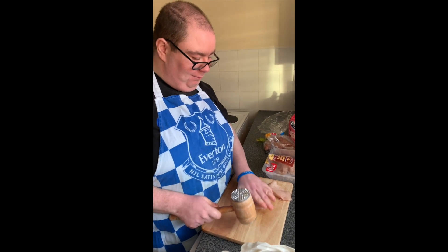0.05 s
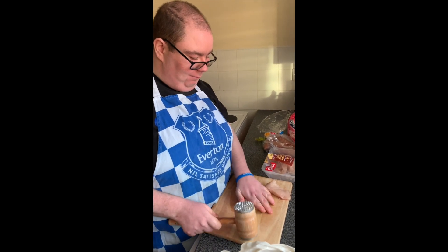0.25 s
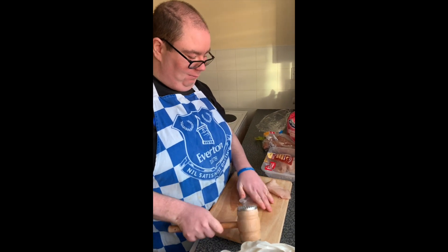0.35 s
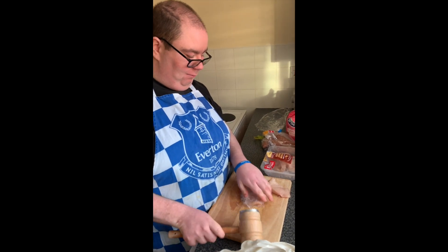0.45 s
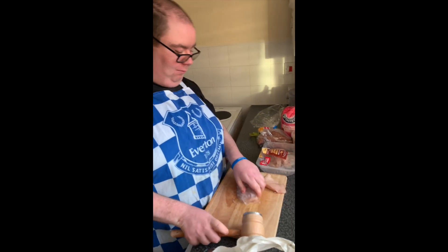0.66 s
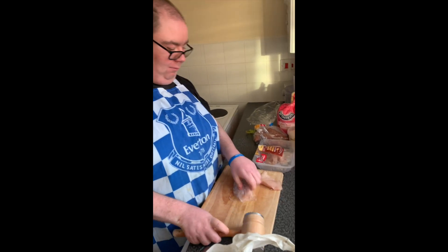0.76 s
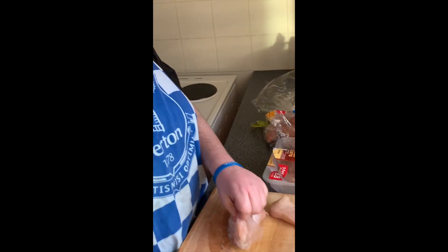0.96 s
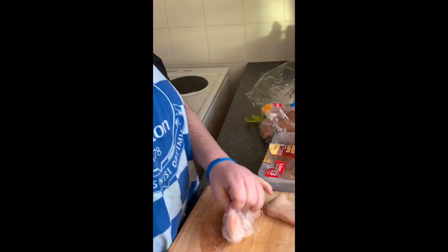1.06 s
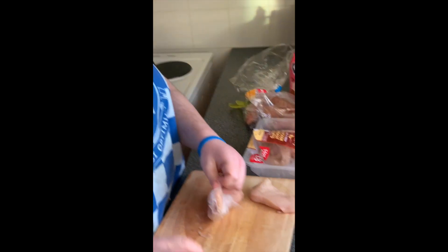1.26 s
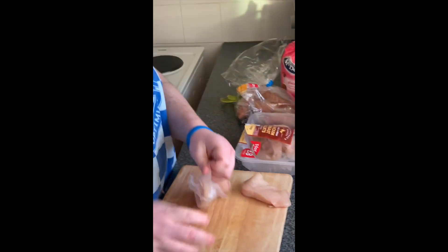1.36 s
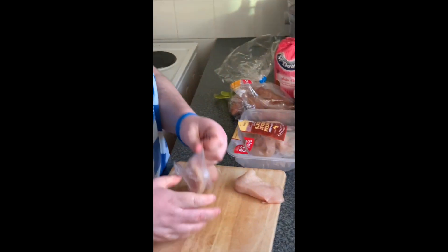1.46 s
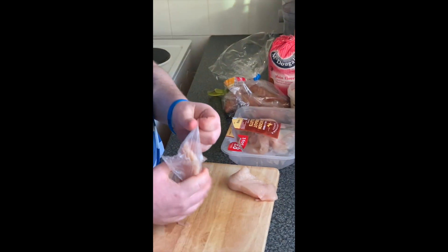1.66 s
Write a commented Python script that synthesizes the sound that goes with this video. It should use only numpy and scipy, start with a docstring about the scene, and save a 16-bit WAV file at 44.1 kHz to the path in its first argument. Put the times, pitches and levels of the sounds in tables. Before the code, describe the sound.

Wooden meat mallet knocks hard on a chopping board, which bounces and booms the hollow worktop

```python
"""Room hum and the rustle of a thin plastic bag come first, in a small kitchen, on a stereo phone microphone.
Then a wooden mallet knocks on a chopping board off to the left: noise slaps and ticks crack, decaying
sine modes ring the board, and it bounces and claps on the worktop. The hollow worktop booms on in slow low
sines. Hum and bag are coloured stereo noise in random patches; a faint fuzzy whine fades in late."""
import sys
import numpy as np
from scipy import signal
from scipy.fft import rfft, irfft, next_fast_len
from scipy.io import wavfile
from scipy.ndimage import uniform_filter1d

SR = 44100
rng = np.random.default_rng(int(sys.argv[2]) if len(sys.argv) > 2 else 0)


def waveform_to_disk(signal):
    """Save audio, clipped to [-1, 1], as 16-bit WAV at the path in sys.argv[1]."""
    frames = np.transpose(np.atleast_2d(signal))
    scaled = np.clip(frames, -1, 1) * 32767
    samples = np.round(scaled).astype(np.int16)
    wavfile.write(sys.argv[1], SR, samples)


N = 74970  # samples, 1.7 s

# Room hum by frequency: f/Hz, relative density level/dB per Hz
HUM_COLOUR = [(25, 3), (50, -13), (105, 4.5), (170, -21), (290, -7), (450, -18.5), (750, -21.5),
              (1000, -14.5), (1400, -26.5), (3000, -32), (8000, -32), (12000, -99.5)]
# Left-right likeness of the hum: f/Hz, correlation (held within -1 to 1)
HUM_LIKENESS = [(60, 1), (380, 0.45), (2380, -0.51), (15000, -1.5)]
# Bag rustle over time: t/s, level of the fine treble/dB, level of the coarser middle/dB
BAG_LEVELS = [(0, -66, -67), (0.062, -60, -57), (0.101, -39.5, -38), (0.173, -62.5, -52.5),
              (0.214, -67, -59), (0.257, -55, -46), (0.392, -49.5, -46), (0.451, -55, -54),
              (0.602, -53, -48), (0.743, -58.5, -58.5), (0.814, -50, -41.5), (0.899, -53, -42.5),
              (1.08, -53.5, -55.5), (1.13, -57.5, -56), (1.25, -54, -51), (1.386, -47.5, -50.5),
              (1.501, -63.5, -54.5), (1.7, -59.5, -58)]
# Fine treble of the plastic: f/Hz, relative density level/dB per Hz
BAG_TREBLE_COLOUR = [(5000, 3), (6500, -6), (8500, 13), (11500, -4), (14000, 5), (15700, -10)]
# Coarser middle of the plastic: f/Hz, relative density level/dB per Hz
BAG_MIDDLE_COLOUR = [(400, -7), (1000, -2.5), (2600, -2), (4500, -8), (7000, -14), (10000, -77)]
# Left-right likeness of the bag: f/Hz, correlation
BAG_LIKENESS = [(1000, 0.12)]
# Booms of the hollow worktop: t/s, level/dB, t60/s before each mode's share
WORKTOP_BOOMS = [(0.13, -38, 1), (0.24, -19.5, 0.38), (0.283, -16, 0.47), (0.362, -33, 0.17),
                 (0.491, -20, 0.31), (0.512, -11.5, 0.23), (0.552, -18.5, 0.87), (0.721, -23.5, 0.36),
                 (0.811, -23.5, 0.82), (0.873, -16, 0.23), (1.173, -30.5, 0.56), (1.224, -26, 0.59),
                 (1.309, -31, 0.78), (1.379, -33, 0.19)]
# Modes of the worktop: f/Hz, relative level/dB, share of the boom's t60 [ratio]
WORKTOP_MODES = [(43.9, -24, 2.3), (75.53, 5, 0.62), (86.7, -1, 0.5), (109.4, 1, 0.24)]
# Mallet knocks: t/s, board level/dB, board lag/s, strongest board f/Hz, ring spread/octaves,
# slap level/dB, slap centre f/Hz, slap spread/octaves, slap t60/s
MALLET_KNOCKS = [(0.203, -33, 0.0075, 260, 0.48, -58, 396, 0.54, 0.037),
                 (0.746, -35, 0.0037, 207, 0.093, -40.5, 463, 0.65, 0.27),
                 (0.234, -9.5, 0.011, 332, 0.63, -14, 700, 1.14, 0.036),
                 (0.296, -14.5, 0.0097, 321, 0.37, -30.5, 780, 1.16, 0.059),
                 (0.385, -28, 0.00476, 230, 0.22, -41, 1330, 0.5, 0.18),
                 (.446, -18.5, 0.012, 229, 0.16, -35.5, 600, 0.7, 0.19),
                 (.513, -4.5, .0095, 269, 0.67, -14.5, 1100, 1, 0.041),
                 (0.54, -45, 0.0018, 293, 0.65, -33, 1750, 1.5, 0.2),
                 (0.658, -31, 0.0013, 246, 0.26, -39, 1390, 1.2, 0.063),
                 (.799, -9.5, .027, 409, 0.39, -18.5, 950, 1.07, 0.12),
                 (1.095, -23.5, 0.00282, 396, 0.17, -37, 997, 0.74, 0.49),
                 (1.167, -17.5, 0.0095, 189.7, 0.34, -29, 1410, 1.1, 0.059)]
# Modes of the chopping board: f/Hz, relative level/dB before scatter, t60/s
BOARD_MODES = [(149.4, -2.5, 0.042), (214.8, -10.5, 0.12), (260.4, 3, 0.082), (316.7, 4, 0.088),
               (413.3, 1, 0.068), (482, 1.5, 0.055), (548.4, 2.5, 0.036), (649, -12.5, 0.27),
               (719, -5, 0.14), (864.5, 5, 0.031), (975, 3, 0.02)]
# Bright ticks of the mallet's rim and the plastic: t/s, level/dB, centre f/Hz, spread/octaves, t60/s
BRIGHT_TICKS = [(.234, -31.5, 3600, 0.94, .05), (0.295, -36.5, 3770, 0.08, 0.036),
                (0.514, -18.5, 2890, 0.98, 0.058), (0.517, -24, 1500, 0.72, 0.097),
                (.8, -34, 2370, 1.13, 0.16), (1.168, -32.5, 2540, 1.26, 0.054),
                (1.398, -42, 1417, 0.071, 0.033), (1.429, -40, 4800, 0.25, 0.032),
                (1.454, -52, 926, 0.56, 0.52)]
# Claps of the bouncing board on the worktop: t/s, level/dB, strongest board f/Hz
BOARD_BOUNCES = [(.263, -15, 332), (.323, -19, 357), (.338, -21.5, 297), (.556, -14.5, 239),
                 (.799, -12.5, 480), (.804, -12, 855), (.815, -14.5, 396), (1.128, -24, 170),
                 (1.197, -22.5, 280)]
# Decay of the kitchen: f/Hz, t60/s
ROOM_T60 = [(60, 0.45), (300, 0.33), (1000, 0.27), (3000, 0.13)]
# Room tail over the direct sound: f/Hz, level/dB
ROOM_LEVEL = [(100, 4), (300, -13), (1000, -5), (4000, -1)]
# Stereo width of the room tail: f/Hz, side gain over mid gain [ratio]
ROOM_WIDTH = [(60, 0.24), (250, 0.48), (600, 1.2), (3000, 1.1), (9000, 2.7)]

HUM_DB, HUM_PATCHY_DB, CRINKLE_DB = -46.5, 3.0, 1.5
WHINE_HZ, WHINE_DB, WHINE_FROM_S, WHINE_OCTAVES = 1385, -60, 1.33, .035
BOOM_RISE_S, RING_RISE_S, SLAP_RISE_S, TICK_RISE_S = .015, .003, .002, .003
CHATTER_S, CHATTER_DB = .025, -15
MODE_SCATTER_DB, BOUNCE_OCTAVES = 3.5, .76
THUD_DB_PER_OCTAVE, THUD_S = 14, .007  # extra level at the start, per octave of ring spread
LEAD_S, TICK_LEAD_S = .00038, .00003  # left microphone ahead of right
ROOM_DELAY_S, TICK_DRIER_DB = .004, 5
BASS_CUT_HZ, TOP_HZ = 36, 15700


def amp(db):
    """Decibels to amplitude."""
    return 10 ** (np.asarray(db) / 20)


def unit(x):
    """Scale a signal to rms 1."""
    return x / np.sqrt(np.mean(x ** 2) + 1e-20)


def along(points, hz):
    """Read (f/Hz, value) points at any frequency, on a log axis."""
    f, values = np.transpose(points)
    return np.interp(np.log(hz + 1), np.log(f + 1), values)


def filtered(x, response):
    """Multiply the spectrum of x by a response of frequency."""
    n = x.shape[-1]
    padded = next_fast_len(n + 8192)
    spectrum = rfft(x, padded) * response(np.fft.rfftfreq(padded, 1 / SR))
    return irfft(spectrum, padded)[..., :n]


def bell(hz, centre_hz, octaves):
    """Gain that falls away on both sides of a centre."""
    return np.exp(-.5 * (np.log2((hz + 1) / centre_hz) / octaves) ** 2)


def patchy_noise(colour, likeness, patchy_db):
    """Stereo noise of rms 1 with random patches of gain; the mid-side balance sets the likeness."""
    noise = signal.stft(rng.standard_normal((2, N)), nperseg=256)[2]
    patches = uniform_filter1d(rng.standard_normal(noise.shape[1:]), size=12, axis=0)  # over frequency
    patches = uniform_filter1d(patches, size=3, axis=1)  # over time
    patchy = signal.istft(noise * amp(patchy_db * unit(patches)), nperseg=256)[1][:, :N]

    def mid_side_gains(hz):
        angle = np.arccos(np.clip(along(likeness, hz), -1, 1)) / 2
        return amp(along(colour, hz)) * [np.cos(angle), np.sin(angle)]

    mid, side = filtered(patchy, mid_side_gains)
    return unit(np.array([mid + side, mid - side]))


def left_first(x, lead_s):
    """A source off to the left reaches that microphone first: a phase shift splits the lead."""
    sides = np.array([[1], [-1]])
    return filtered(x, lambda hz: np.exp(1j * np.pi * hz * lead_s * sides))


def in_room(x, lead_s, drier_db=0):
    """Direct sound plus a fresh noise tail; each frequency dies at its own speed."""
    hz, t, noise = signal.stft(rng.standard_normal((2, len(x))), SR, nperseg=256)
    decay = amp(-60 * t / along(ROOM_T60, hz)[:, None])
    tail = signal.istft(noise * decay, SR, nperseg=256)[1]
    tail = tail / np.linalg.norm(tail[0])
    tail = np.pad(tail, ((0, 0), (round(ROOM_DELAY_S * SR), 0)))
    wet = signal.fftconvolve(x[None], tail, axes=1)[:, :len(x)]

    def mid_side_gains(f):
        return amp(along(ROOM_LEVEL, f) - drier_db) * [np.ones_like(f), along(ROOM_WIDTH, f)]

    mid, side = filtered(wet, mid_side_gains)
    return left_first(x, lead_s) + [mid + side, mid - side]


def burst(db, centre_hz, octaves, t60, rise_s):
    """Half a second of coloured noise, steeper above its centre, that rises fast and dies."""
    t = np.arange(SR // 2) / SR

    def colour(hz):
        return bell(hz, centre_hz, np.where(hz > centre_hz, octaves / 2, octaves))

    noise = unit(filtered(rng.standard_normal(len(t)), colour))
    return noise * amp(db - 60 * t / t60) * (1 - np.exp(-t / rise_s))


def board_ring(t, ring_hz, ring_octaves):
    """Decaying board modes around ring_hz, peak 1; a wider spread starts with a stronger brief thud."""
    hz, level_db, t60 = np.transpose(BOARD_MODES)[:, :, None]
    scatter_db = MODE_SCATTER_DB * rng.standard_normal(hz.shape)
    mode_gain = amp(level_db + scatter_db - 60 * t / t60) * bell(hz, ring_hz, ring_octaves)
    ring = np.sum(mode_gain * np.sin(2 * np.pi * hz * t), axis=0)
    ring *= 1 - np.exp(-t / RING_RISE_S)
    ring *= amp(THUD_DB_PER_OCTAVE * ring_octaves * np.exp(-t / THUD_S))
    return ring / np.abs(ring).max()


def hum():
    """The room's steady hum is patchy noise; a narrow noise band, the fuzzy whine, fades in late."""
    whine = unit(filtered(rng.standard_normal(N), lambda hz: bell(hz, WHINE_HZ, WHINE_OCTAVES)))
    whine *= np.clip((np.arange(N) / SR - WHINE_FROM_S) * 10, 0, 1)  # fades in over 0.1 s
    steady = amp(HUM_DB) * patchy_noise(HUM_COLOUR, HUM_LIKENESS, HUM_PATCHY_DB)
    return steady + amp(WHINE_DB) * whine


def bag():
    """Thin plastic rustles under the hands: two noise bands follow their own levels."""
    t = np.arange(N) / SR
    times, treble_db, middle_db = np.transpose(BAG_LEVELS)
    treble = patchy_noise(BAG_TREBLE_COLOUR, BAG_LIKENESS, CRINKLE_DB)
    middle = patchy_noise(BAG_MIDDLE_COLOUR, BAG_LIKENESS, CRINKLE_DB)
    return amp(np.interp(t, times, treble_db)) * treble + amp(np.interp(t, times, middle_db)) * middle


def worktop():
    """The hollow worktop swells and rings in low sine modes, reaching the left microphone first."""
    out = np.zeros(N + SR)
    t = np.arange(SR) / SR
    for start, db, t60 in WORKTOP_BOOMS:
        ring = sum(amp(level - 60 * t / abs(t60 * share)) * np.sin(2 * np.pi * hz * t)
                   for hz, level, share in WORKTOP_MODES)
        out[round(start * SR):][:SR] += amp(db) * ring * (1 - np.exp(-t / BOOM_RISE_S))
    return amp([[-.7], [.7]]) * left_first(out[:N], LEAD_S)  # right slightly louder


def knocks():
    """A noisy slap leads; a delayed push and sparse dying chatter ring the board's modes."""
    out = np.zeros((2, N + SR))
    t = np.arange(SR // 2) / SR
    for start, board_db, lag, ring_hz, ring_octaves, slap_db, slap_hz, slap_octaves, slap_t60 in MALLET_KNOCKS:
        push = amp(CHATTER_DB) * rng.standard_normal(len(t)) * np.exp(-t / CHATTER_S)
        push *= rng.random(len(t)) < .01  # chatter on about one sample in a hundred
        push[round(lag * SR)] += 1
        ring = board_ring(t, ring_hz, ring_octaves)
        board = signal.fftconvolve(ring, push)[:len(t)] * amp(board_db)
        slap = burst(slap_db, slap_hz, slap_octaves, slap_t60, SLAP_RISE_S)
        out[:, round(start * SR):][:, :len(t)] += in_room(board + slap, LEAD_S)
    return out[:, :N]


def ticks():
    """Bright cracks of the mallet's rim and the plastic: noise bursts with a drier room tail."""
    out = np.zeros((2, N + SR))
    for start, db, hz, octaves, t60 in BRIGHT_TICKS:
        tick = burst(db, hz, octaves, t60, TICK_RISE_S)
        out[:, round(start * SR):][:, :len(tick)] += in_room(tick, TICK_LEAD_S, TICK_DRIER_DB)
    return out[:, :N]


def bounces():
    """The board bounces; each clap on the worktop rings its modes anew."""
    out = np.zeros((2, N + SR))
    t = np.arange(SR // 4) / SR
    for start, db, ring_hz in BOARD_BOUNCES:
        clap = amp(db) * board_ring(t, ring_hz, BOUNCE_OCTAVES)
        out[:, round(start * SR):][:, :len(t)] += in_room(clap, LEAD_S)
    return out[:, :N]


def scene():
    """All the sounds of the kitchen, summed at the two microphones."""
    return knocks() + bounces() + ticks() + worktop() + bag() + hum()


def record(dry):
    """The phone drops the lowest bass and keeps nothing from its band limit up."""
    def response(hz):
        bass_cut = 1 / np.sqrt(1 + (BASS_CUT_HZ / (hz + 1)) ** 12)
        return (hz < TOP_HZ) * bass_cut

    return filtered(dry, response)


dry = scene()
out = record(dry)
waveform_to_disk(out)
```